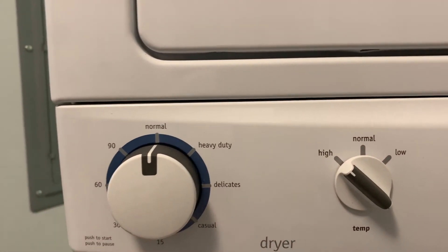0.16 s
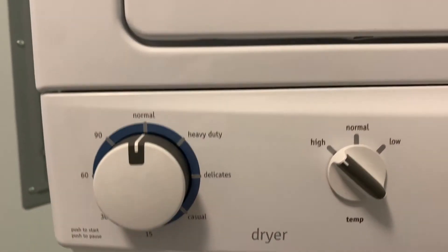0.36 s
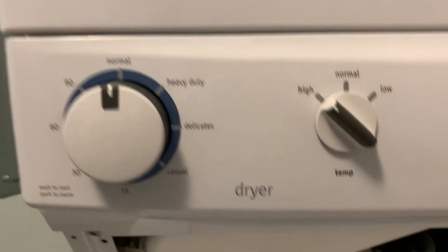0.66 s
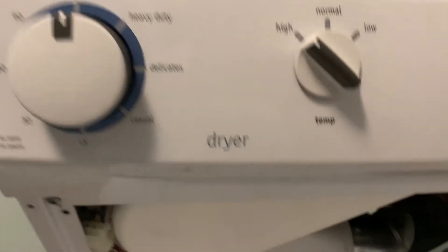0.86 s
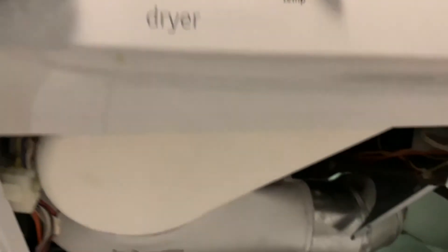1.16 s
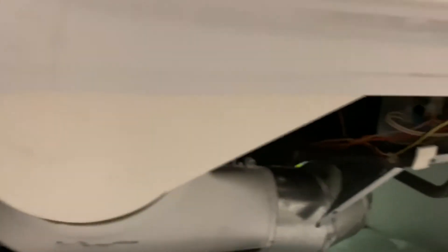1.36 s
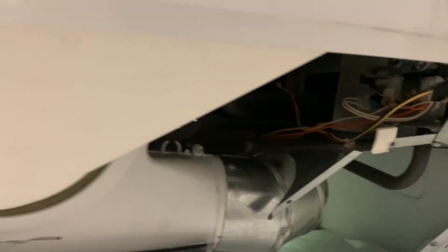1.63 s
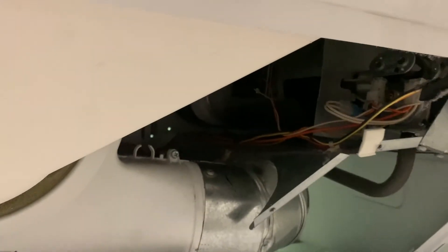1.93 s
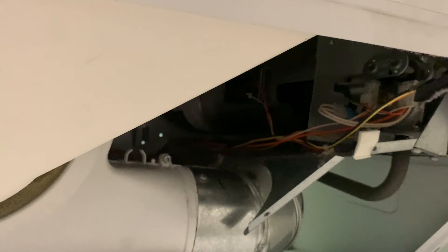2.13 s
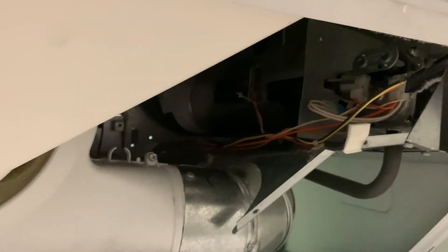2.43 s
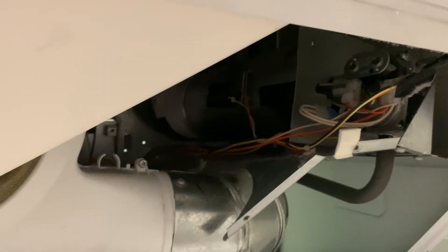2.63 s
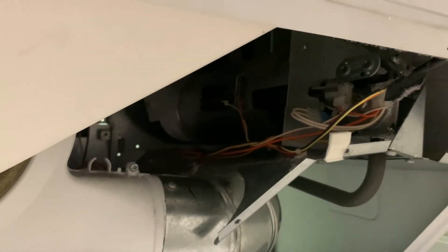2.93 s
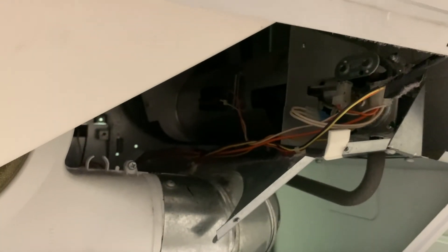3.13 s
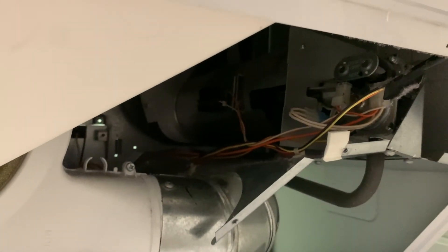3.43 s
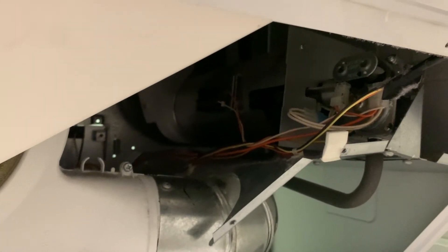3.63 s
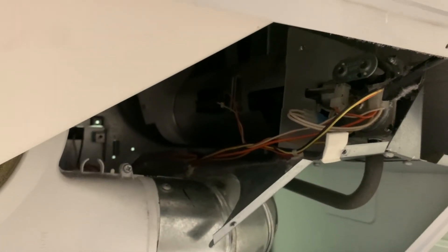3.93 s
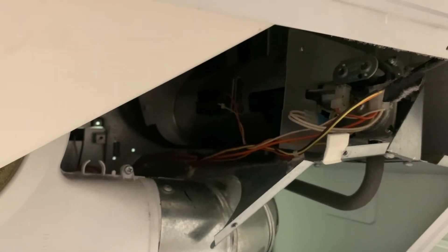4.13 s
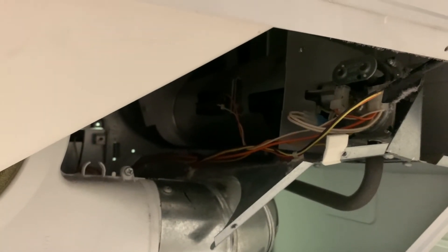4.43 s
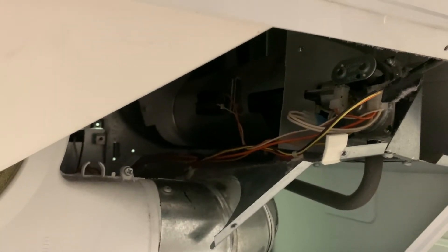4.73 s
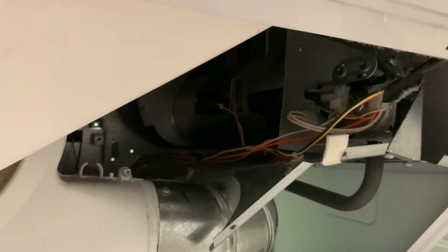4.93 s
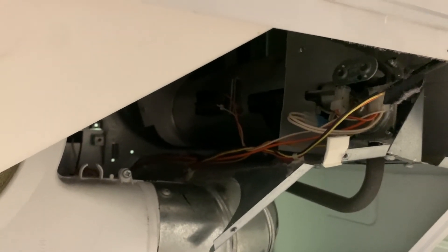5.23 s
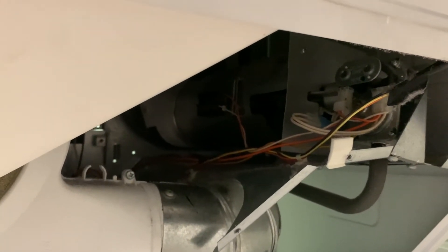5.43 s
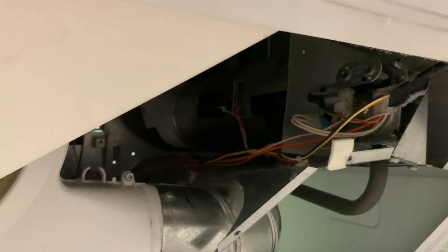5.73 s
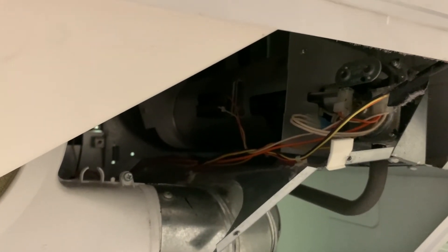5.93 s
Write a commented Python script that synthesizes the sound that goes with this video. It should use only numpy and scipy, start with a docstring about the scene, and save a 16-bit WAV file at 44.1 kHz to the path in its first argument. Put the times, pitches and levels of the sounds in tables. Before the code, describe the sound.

A clothes dryer heard close up in a small room. A brief rough squeal and metallic ringing fade from the start switch, leaving a low motor hum, drum rumble and soft rubbing. The hum grows as the microphone lowers to the open panel. Light rapid ticks come and go, the drum drags about once a second, and near the end a gas valve clacks hard and rings.

```python
"""Clothes dryer, close by, lower panel open

A dryer has just been switched on: its cabinet still rings and a rough squeal fades, both shaped from noise.
The motor hums in sines at twice the mains rate and ticks once a shaft turn, in short bursts of noise.
The drum rumbles, drags on its seal once a turn and growls on its rollers, all in coloured stereo noise.
The microphone moves from the control panel down to the open panel, so the hum grows.
Near the end a gas valve snaps over into ringing resonances, and the gain control ducks loud moments."""
import sys
import numpy as np
from scipy import signal
from scipy.fft import rfft, irfft
from scipy.io import wavfile
from scipy.ndimage import uniform_filter1d, minimum_filter1d

SR = 44100
rng = np.random.default_rng(int(sys.argv[2]) if len(sys.argv) > 2 else 0)


def bounce(signal):
    """Save signal as a 16-bit WAV file at the path given by the first command-line argument."""
    frames = np.transpose(np.atleast_2d(signal))
    limited = np.clip(frames, -1, 1)
    pcm = np.round(limited * 32767).astype(np.int16)
    wavfile.write(sys.argv[1], SR, pcm)


N = 268392
TIME = np.arange(N) / SR
BIN_HZ = np.arange(N // 2 + 1) * SR / N

HUM_HZ, SHAFT_HZ = 119.86, 29.386
WAVER_HZ = 4.3  # rate of the slow waver in rumble and drone
TICK_START_DB = -11  # ticks and their steady rub are fainter just after the start


def from_db(db):
    """Decibels to gain."""
    return 10 ** (np.asarray(db) / 20)


def rms_one(x):
    """Scale to unit rms."""
    return x / np.sqrt(np.mean(x ** 2) + 1e-20)


def in_time(rows):
    """Each column of a curve, sample by sample."""
    s, *columns = np.transpose(rows)
    return [np.interp(TIME, s, column) for column in columns]


def at_hz(points, hz):
    """Read a spectrum on a log-frequency axis."""
    f, value = np.transpose(points)
    return np.interp(np.log(hz + 1e-6), np.log(f), value)


def pan(db):
    """Left and right gains for a level difference; positive leans left."""
    return from_db(np.array([[.5], [-.5]]) * db)


def drift(rate):
    """Slow chance with spread 1: every 32nd sample is drawn, smoothed and joined up."""
    count = N // 32 + 2
    hz = np.arange(count // 2 + 1) * SR / N
    smoothing = 1 / (1 + (hz / rate) ** 2) ** 2
    slow = irfft(rfft(rng.standard_normal(count)) * smoothing, count)
    return np.interp(np.linspace(0, count - 1, N), np.arange(count), rms_one(slow))


def two_drifts(rate):
    """Independent complex drifts for left and right, which roughen a pure tone."""
    return np.array([drift(rate) + 1j * drift(rate) for _ in "LR"])


def cabinet(hz):
    """Gain of the steel box: each main resonance lifts a band, and a crowd of small ones ripples the treble."""
    # Each row: centre in Hz, width in Hz, lift in dB.
    resonances = [(753, 138, 3.2), (1012, 128, 0.5), (1227, 113, 1.2), (1464, 180, 2.7), (1744, 220, 2.0),
                  (2304, 220, 4.4), (2734, 220, 2.0), (3402, 220, 4.1), (5167, 120, 4.3), (5577, 110, 3.5),
                  (5986, 220, 4.6), (6330, 107, 2.5), (6912, 98, 3.0), (7407, 220, 4.9), (7730, 81, 2.7),
                  (8031, 92, 2.7), (8548, 220, 7.2), (8957, 150, 3.3), (9173, 114, 5.4), (10249, 220, 7.6),
                  (11304, 123, 4.7), (12252, 196, 7.4), (13630, 189, 4.8)]
    lift_db = sum(db / (1 + (2 * (hz - centre) / width) ** 2) for centre, width, db in resonances)
    grid = np.arange(0, SR / 2, 22)
    ripple = np.interp(hz, grid, rng.standard_normal(len(grid)))
    ripple_db = 2.4 * ripple * np.clip(hz / 600 - 1, 0, 1)  # sets in above 600 Hz
    return from_db(lift_db + ripple_db)


def stereo_noise(spectrum):
    """Noise coloured by the cabinet, alike at both microphones in the bass, diffuse in the treble; rms 1."""
    # How alike left and right are. Each row: frequency in Hz, correlation from 0 to 1.
    likeness = [(30, .75), (80, .96), (170, .95), (280, .78), (450, .45), (800, .35), (1500, 0), (16000, 0)]
    # Balance of the stereo picture. Each row: frequency in Hz, left over right in dB.
    lean = [(30, 24), (80, -4.5), (400, 2), (900, 4), (1800, 0), (3500, 0), (5500, -4), (8000, -0.5)]
    mid, side = rng.standard_normal((2, len(BIN_HZ))) + 1j * rng.standard_normal((2, len(BIN_HZ)))
    alike = np.clip(at_hz(likeness, BIN_HZ), -1, 1)
    both = np.sqrt(1 + alike) * mid + np.sqrt(1 - alike) * side * [[1], [-1]]
    low_cut = 1 / (1 + (spectrum[0][0] / 2 / (BIN_HZ + 1)) ** 2)
    high_cut = 1 / (1 + (BIN_HZ / spectrum[-1][0] / 2) ** 2) ** 2
    colour = low_cut * high_cut * from_db(at_hz(spectrum, BIN_HZ)) * cabinet(BIN_HZ)
    return rms_one(irfft(both * colour * pan(at_hz(lean, BIN_HZ)), N))


def bursts(rows):
    """Envelope of blows (s, dB, t60 in s) that start at once and die away; their powers add."""
    power = np.zeros(N)
    for s, db, t60 in rows:
        start = max(round(s * SR), 0)
        age = TIME[:min(N - start, int(2 * t60 * SR))]
        power[start:start + len(age)] += from_db(db - 60 * age / t60) ** 2
    return np.sqrt(power)


def swells(rows):
    """Gain of bell-shaped swells (middle s, length s, peak dB)."""
    return sum(from_db(db) * np.exp(-2 * ((TIME - s) / length) ** 2) for s, length, db in rows)


def resonance(x, hz, width_hz):
    """Two-pole resonance with gain 1 on top."""
    r = np.exp(-np.pi * width_hz / SR)
    feed = np.array([1, 0, -1]) * (1 - r * r) / 2
    feedback = [1, -2 * r * np.cos(2 * np.pi * hz / SR), r * r]
    return signal.lfilter(feed, feedback, x + 1e-18)


def tone(hz, lead, wander, flutter_db):
    """A stereo sine of rms about 1 whose phase and level waver; lead and wander are in radians."""
    phase = 2 * np.pi * (hz * TIME + rng.random()) + wander * drift(14.0)
    sine = np.sin(phase + np.array([[.5], [-.5]]) * lead)
    return np.sqrt(2) * sine * from_db(flutter_db * drift(7.7))


def at_ports(x):
    """A direct sound from the right reaches the left microphone port a little later."""
    # Each row: frequency in Hz, cycles by which the left port lags.
    port_lag = [(0, 0), (8400, 1.5), (13450, 2.5), (16000, 3.05)]
    cycles = np.interp(BIN_HZ, *np.transpose(port_lag))
    left = irfft(rfft(x) * np.exp(-2j * np.pi * cycles), N)
    return np.array([left, x])


def switch_ring(squeal_db=-45.5, wash_db=-35.5, wash_t60=1.25):
    """The cabinet is still ringing from the start switch, and a rough, wavering squeal fades with it."""
    # Spectrum of the ringing. Each row: frequency in Hz, relative density in dB per Hz.
    ring_spectrum = [(1200, 4), (2100, -1), (2650, 9.5), (3100, 1), (3600, 4), (4700, 5), (5600, -5.5),
                     (7000, -0.5), (8000, -23), (9200, -9), (10200, -5), (11000, -11), (16000, -30)]
    # Start-up squeal. Each row: time in seconds, pitch in Hz, level in dB against squeal_db.
    squeal_curve = [(0, 2540, 4), (.02, 2700, -3), (.035, 2800, -1), (.06, 2720, -4), (.09, 2660, 1),
                    (.12, 2620, -7), (.135, 2750, -3), (.165, 2740, -5), (.185, 2630, -8), (.21, 2650, -2),
                    (.226, 2720, -13), (.24, 2910, -2), (.28, 2770, -5), (.33, 2800, -12), (.45, 2770, -28),
                    (.6, 2770, -80)]
    roughness, spread_hz = .8, 190
    wash = stereo_noise(ring_spectrum) * bursts([(0, wash_db, wash_t60)])
    pitch_hz, level_db = in_time(squeal_curve)
    whistle = np.exp(2j * np.pi * np.cumsum(pitch_hz) / SR)
    squeal = rms_one(np.real(whistle * (1 + roughness * two_drifts(spread_hz))))
    return wash + from_db(squeal_db + level_db) * squeal


def drum_drag():
    """How hard the drum drags, 0 to about 1.2: a soft-edged stretch that comes round once a turn."""
    # Each row: middle in seconds, length in seconds, strength.
    drags = [(1.34, 0.53, 1.1), (2.478, 0.4, 1), (3.61, 0.33, 1.2), (4.82, 0.54, 1.04), (5.95, 0.53, 1)]
    edge_s = 0.1
    return sum(strength * (.5 + .5 * np.tanh((length - 2 * np.abs(TIME - middle)) / edge_s))
               for middle, length, strength in drags)


def motor(hum_db, side_follow=0.46):
    """Magnetic hum and its harmonics, with sidebands at steps of the shaft rate; some have their own level curves."""
    # Each row: multiple of the hum, shaft sideband number, level in dB against its curve,
    # left over right in dB, left lead in radians.
    lines = [(0, 1, -31.7, 1.4, -0.3), (1, -1, -18.8, 7.2, -0.3), (1, 0, 0.0, 1.6, 0.1),
             (1, 1, -13.0, -0.5, -0.0), (1, 2, -21.6, 0.8, -0.3), (2, -1, -10.2, 4.4, -0.1),
             (2, 0, -15.0, -2.1, -0.2), (2, 1, -20.0, -0.8, 0.6), (3, -1, -19.0, 2.8, -0.0),
             (3, 0, 0.0, 5.7, -0.8), (4, 0, -24.0, 8.8, -2.0), (4, 1, -30.6, 2.6, -0.2),
             (5, 0, 0.0, 4.4, -0.9), (6, -1, -32.7, 5.4, -0.9), (7, 0, -31.5, -1.7, 1.1),
             (10, 2, -40.5, 0, 0)]
    # Lower sideband near 210 Hz. Each row: time in seconds, level in dB against the other sidebands.
    sideband_level = [(0, -1.5), (0.6, 0), (1.3, -2), (1.6, 2), (2.1, 0.5), (2.7, -1), (3.25, 3),
                      (3.68, -4.5), (4.15, 3.5), (4.7, -3), (5.15, 0.5), (5.42, 4), (5.6, 2), (5.8, -5),
                      (6.09, -6)]
    # Third harmonic, sinking around the drags. Each row: time in seconds, level in dB.
    third_level = [(0, -38.5), (0.95, -32.5), (1.15, -42), (1.42, -59), (1.65, -30), (1.9, -28), (2.2, -30),
                   (2.35, -57), (2.58, -51), (2.76, -31.5), (3.25, -29), (3.5, -46), (3.75, -43),
                   (3.9, -36), (4.2, -26.5), (4.48, -33), (4.75, -37.5), (5.0, -42), (5.13, -33),
                   (5.55, -29.5), (5.8, -37), (6.09, -34)]
    # Fifth harmonic, stronger at the open panel. Each row: time in seconds, level in dB.
    fifth_level = [(0, -58), (0.8, -47), (1.4, -52), (1.95, -40), (2.25, -45), (2.5, -48), (2.95, -41.5),
                   (3.3, -41), (3.72, -51), (4.05, -44.5), (4.4, -40.5), (4.8, -53), (5.2, -46),
                   (5.55, -41), (5.85, -46), (6.09, -51)]
    middle_db = np.median(hum_db)
    side_db = middle_db + side_follow * (hum_db - middle_db)  # the rest changes less with position
    own_db = {(1, 0): hum_db, (2, -1): side_db + in_time(sideband_level)[0],
              (3, 0): in_time(third_level)[0], (5, 0): in_time(fifth_level)[0]}
    out = np.zeros((2, N))
    for multiple, sideband, db, lean_db, lead in lines:
        which = (multiple, sideband)
        unrest = .25 if which == (1, 0) else 1  # the main hum is the steadiest
        hz = multiple * HUM_HZ + sideband * SHAFT_HZ
        line = tone(hz, lead, wander=.15 * unrest, flutter_db=1.1 * unrest)
        out += line * pan(lean_db) * from_db(db + own_db.get(which, side_db))
    return out


def drone_level():
    """Level curve of the blower drone in dB: swells over a low, wavering rest."""
    # Swells as the drag sets in and lets go. Each row: middle in seconds, length in seconds,
    # peak in dB before the blower's trim.
    drone_swells = [(1.2, 0.14, -28), (1.41, 0.26, -27), (2.307, 0.1, -24.5), (2.634, 0.135, -24),
                    (2.89, .09, -33), (3.44, 0.08, -26), (3.745, .125, -24.5), (4.61, 0.2, -27.5),
                    (4.985, 0.18, -22.5), (5.96, 0.2, -31)]
    rest_db, waver_db = -40, 2.5
    rest = from_db(rest_db + waver_db * drift(WAVER_HZ))
    return 20 * np.log10(np.hypot(swells(drone_swells), rest))


def blower(drone_db):
    """The blower housing drones on one wavering note, leaning left and swelling around the drags."""
    drone = tone(297, lead=.05, wander=.18, flutter_db=.4)
    return drone * from_db(drone_db - 2.5) * pan(6.5)


def panel(level_db):
    """The sheet-metal front booms briefly and sings two thin notes at sidebands of the motor."""
    # Boom just after the start. Each row: time in seconds, level in dB.
    boom_level = [(0, -48), (0.2, -43), (0.7, -38), (1.0, -47), (1.5, -39), (2.0, -77), (6.09, -60)]
    # Thin whine near 750 Hz. Each row: time in seconds, level in dB.
    whine_level = [(0, -43), (0.15, -42.5), (0.55, -43.5), (0.88, -41.5), (1.05, -44), (1.6, -51),
                   (6.09, -58)]
    boom = tone(56.5, lead=0, wander=.15, flutter_db=.5) * from_db(in_time(boom_level)[0])
    low = tone(4 * HUM_HZ + SHAFT_HZ, lead=0, wander=.2, flutter_db=1.5)
    whine = tone(6 * HUM_HZ + SHAFT_HZ, lead=.3, wander=.5, flutter_db=1.5)
    return boom * pan(-1.5) + from_db(level_db - 48.5) * low + whine * from_db(in_time(whine_level)[0])


def drum(rumble_db, body_db=-25.0, crossover_hz=340):
    """The drum rumbles in a deep body and a higher shell, and its rim rubs grainily over the felt seal."""
    # Rumble spectrum. Each row: frequency in Hz, relative density in dB per Hz.
    rumble_spectrum = [(25, -27), (42, -29), (56, -8), (80, -10), (105, -10.5), (180, -6), (250, -10.5),
                       (310, -5.5), (440, -5), (540, -9.5), (640, -12), (760, -6), (900, -14.5),
                       (1600, -25)]
    # Rubbing spectrum. Each row: frequency in Hz, relative density in dB per Hz.
    rub_spectrum = [(700, 2), (1000, 7), (1300, 1), (1600, -1), (1900, -4.5), (2350, -4.5), (2900, -10),
                    (3450, -10.5), (4200, -10), (5500, -18.5), (7000, -17), (10000, -63), (16000, -27)]
    # Pressure of rim on seal. Each row: time in seconds, rubbing level in dB before a lift of 4 dB.
    rub_level = [(0, -49.5), (0.5, -45.5), (0.95, -48), (1.15, -44), (1.42, -43), (1.65, -44.5),
                 (2.15, -44.5), (2.3, -41.3), (2.62, -43), (2.85, -44), (3.22, -45.5), (3.42, -42.5),
                 (3.75, -41.5), (3.9, -44.5), (4.4, -45.5), (4.6, -43), (5.02, -41.5), (5.14, -46),
                 (5.6, -42.5), (5.85, -44), (6.09, -41.5)]
    rumble = stereo_noise(rumble_spectrum)
    deep = signal.sosfiltfilt(signal.butter(2, crossover_hz, fs=SR, output="sos"), rumble)
    body = deep * from_db(body_db + 1.8 * (rumble_db - rumble_db.mean()))
    shell = (rumble - deep) * from_db(rumble_db + 4.0)
    grain_db = 1.28 * drift(43)
    rub = stereo_noise(rub_spectrum) * from_db(in_time(rub_level)[0] + 4.0 + grain_db)
    return body + shell + rub


def rollers(front):
    """The support rollers growl in a narrow band of the drum, in uneven surges."""
    # Growl spectrum. Each row: frequency in Hz, relative density in dB per Hz.
    growl_spectrum = [(280, -21), (380, -3), (440, -2), (480, -7), (560, -32), (800, -31.5)]
    # Each row: middle in seconds, length in seconds, peak in dB.
    surges = [(1.47, 0.11, -30.5), (2.22, .12, -41), (2.5, 0.22, -28.5), (2.87, 0.12, -33),
              (3.13, 0.075, -29), (3.53, 0.17, -28), (3.9, .1, -30), (4.2, 0.11, -31.5), (4.5, 0.17, -44),
              (4.76, 0.13, -30), (4.95, 0.07, -31), (5.15, 0.13, -29), (5.95, 0.2, -36)]
    rest = from_db(-34 - 5 * front)  # fainter in front of the control panel
    return stereo_noise(growl_spectrum) * np.hypot(swells(surges), rest)


def unsettled(s):
    """1 for the first third of a second, then falling to 0 once the machine has settled."""
    settle_s = 0.66
    return np.clip(2 * (1 - s / settle_s), 0, 1)


def tick_hits(drag, sharp_db=7.5):
    """Rows (s, dB) of all ticks: the sharp ones, and a faint one on each shaft turn between them."""
    # Spells of firmer ticking. Each row: start in seconds, length in seconds, lift in dB.
    spells = [(0.7, .4, 5.5), (1.9, .55, 7), (2.6, .12, 4), (3.3, .42, 5), (3.93, .09, 7.5), (4.28, .16, 7),
              (4.54, .22, 2.5), (4.88, .08, 6), (5.23, .42, 8.5)]
    # Single sharp ticks. Each row: time in seconds, level in dB before the lift sharp_db.
    sharp_ticks = [(0.273, -39.5), (1.3907, -41.5), (1.4915, -40.5), (1.5274, -44), (1.5993, -38),
                   (1.6342, -35.5), (1.6676, -38.5), (1.703, -38.5), (1.7365, -37.5), (1.8771, -41.5),
                   (2.042, -35), (2.108, -36), (2.2752, -37.5), (2.3804, -40.5), (2.858, -38.5),
                   (2.8933, -35), (2.9267, -36), (3.0945, -38), (3.234, -38), (3.8776, -37.5),
                   (3.9105, -39), (4.0517, -37.5), (4.0861, -37), (4.12, -36.5), (4.1525, -36.5),
                   (4.1864, -36.5), (4.2198, -35), (4.2542, -37), (4.6867, -40), (4.8274, -40.5),
                   (5.137, -35.5), (5.1726, -40.5), (5.4131, -35), (5.4585, -48), (5.482, -36.5),
                   (5.5139, -38), (5.5797, -38)]
    first_s, early_s = 0.0345, 0.0065
    faint_db, drag_db, scatter_db = -43, 1, 2.5
    s = np.arange(first_s, TIME[-1], 1 / SHAFT_HZ)
    dragging = np.interp(s, TIME, drag)  # under drag the faint ticks come slightly louder and early
    db = faint_db + drag_db * dragging + TICK_START_DB * unsettled(s)
    db = db + scatter_db * rng.standard_normal(len(s))
    for start, length, spell_db in spells:
        db = db + spell_db * ((s >= start) & (s < start + length))
    sharp = np.array(sharp_ticks) + [0, sharp_db]
    free = np.abs(s[:, None] - sharp[:, 0]).min(axis=1) > .5 / SHAFT_HZ
    faint = list(zip((s - early_s * dragging)[free], db[free]))
    return faint + list(sharp)


def shaft_ticks(drag, after_db=-8, steady_db=-48, contact_t60=0.067, after_t60=0.23):
    """A light scuff once a shaft turn over a faint steady rub: pressure envelopes on one coloured noise."""
    # Scuff spectrum. Each row: frequency in Hz, relative density in dB per Hz.
    scuff_spectrum = [(1500, -13), (4000, 2), (5500, -2), (8500, 6), (10200, 2.5), (11000, -0.5),
                      (13000, 1), (15000, -7), (16000, -2.5)]
    hits = tick_hits(drag)
    contact = bursts([(s, db, contact_t60) for s, db in hits])
    # the box carries each tick on briefly
    after = bursts([(s, db + after_db, after_t60) for s, db in hits])
    steady = from_db(steady_db + TICK_START_DB * unsettled(TIME))
    total = np.sqrt(contact ** 2 + after ** 2 + steady ** 2)
    pressure = signal.lfilter(*signal.butter(1, 125, fs=SR), total)  # softens the onsets
    colour = from_db(at_hz(scuff_spectrum, BIN_HZ)) * cabinet(BIN_HZ)
    noise = rms_one(irfft(rfft(rng.standard_normal(N)) * colour, N))
    return from_db(-8.0) * at_ports(pressure * noise)  # the trim sets all ticks and the rub


def valve_body(force):
    """What the valve body makes of a force: ringing modes and a bright crack."""
    # Each row: frequency in Hz, width in Hz, relative level in dB.
    body_modes = [(2160, 120, 2), (2350, 130, 0), (2700, 180, -8), (3290, 170, 2.5), (3520, 140, 2),
                  (3690, 180, 0), (4650, 190, -1), (4900, 190, -4.5), (5450, 260, -6.5), (6100, 180, -5),
                  (6500, 170, -5), (6800, 240, -3), (7700, 480, -7.5), (8550, 540, -5.5), (10300, 400, -14),
                  (11400, 420, -4), (12700, 300, -11), (14600, 370, -10), (15000, 500, -10.5)]
    ring = sum((-1) ** k * from_db(db) * resonance(force, hz, width)
               for k, (hz, width, db) in enumerate(body_modes))
    crack = signal.sosfilt(signal.butter(2, 2400, "high", fs=SR, output="sos"), force + 1e-18)
    return ring + from_db(-17.5) * crack


def bracket(struck_s, ring_db=-32.5):
    """The loose bracket keeps rattling against the frame, so each of its modes rings roughly and unevenly."""
    # Each row: frequency in Hz, level in dB against ring_db, t60 in seconds.
    bracket_modes = [(1375, -6, .4), (2170, 1, .4), (2360, -1, .5), (2790, -5, .3), (3300, -1, .4),
                     (3490, -4, .5), (3680, -3, .3), (4560, -2, .2), (4670, 0, .5), (4950, -1, .45),
                     (5540, -2, .35), (5850, -6, .35), (6800, -2, .35), (7450, -8, .3)]
    ring = 0
    for hz, db, t60 in bracket_modes:
        rough = rms_one(np.real(two_drifts(55) * np.exp(2j * np.pi * hz * TIME)))
        ring = ring + rough * bursts([(struck_s, ring_db + db, t60)])
    return ring


def gas_valve(early_db=-22.5, early_t60=0.36, late_db=-32.0, late_t60=1.64,
              linger_db=-30, linger_t60=0.55, split_hz=7000):
    """The plunger rattles brightly and slams home, the frame thumps, and the bracket and sheet metal ring on."""
    # Plunger lifting, scraping, seating and bouncing. Each row: time in seconds, strength in dB,
    # rattle t60 in seconds, weight of the low part in dB.
    contacts = [(5.646, -14, 0.06, -10), (5.6503, -13.5, 0.33, -6), (5.655, -20, 0.04, 7),
                (5.6579, 9.5, 0.017, -8.5), (5.6613, 2.5, 0.037, 1.5), (5.665, -5.5, 0.096, 2)]
    # Spectrum of the ringing sheets. Each row: frequency in Hz, relative density in dB per Hz.
    wash_spectrum = [(1200, 7.5), (2200, 0.5), (2850, 2), (3350, 3.5), (4100, -1), (4650, 1), (5600, -1.5),
                     (6300, -8), (6850, 0), (7900, -45), (10300, -16), (11500, -11), (16000, -41)]
    seated = max(contacts, key=lambda row: row[1] + row[3])[0]  # the heaviest contact
    linger = [(seated, linger_db, linger_t60)]
    bright_rows = [(s, db, t60) for s, db, t60, _ in contacts]
    heavy_rows = [(s, db + weight_db, t60) for s, db, t60, weight_db in contacts]
    bright = bursts(bright_rows + linger) * rng.standard_normal(N)
    heavy = bursts(heavy_rows + linger) * rng.standard_normal((2, N))
    high, low = (signal.butter(4, split_hz, kind, fs=SR, output="sos") for kind in ("high", "low"))
    # the treble comes direct from one side, the rest differs left and right
    force = at_ports(signal.sosfilt(high, bright + 1e-18)) + signal.sosfilt(low, heavy + 1e-18)
    knock = from_db(-10.5) * resonance(force, 850, 420)
    thump = -bursts([(seated, -9, .04)]) * np.cos(2 * np.pi * 145 * (TIME - seated))
    fading = bursts([(seated, early_db, early_t60), (seated, late_db, late_t60)])
    shudder = from_db(2 * drift(60))  # of the loose sheets
    wash = stereo_noise(wash_spectrum) * fading * shudder
    body = (from_db(1.0) * valve_body(force) + knock) * pan(-0.76)
    return body + thump + wash + bracket(seated)


def scene():
    """The running dryer: motor, blower, front sheet, drum, rollers and ticks, with start switch and gas valve."""
    # Hum, growing as the microphone moves down to the open panel. Each row: time in seconds, level in dB.
    hum_level = [(0, -27), (0.04, -29.5), (0.55, -26.5), (1.2, -23.5), (1.8, -22), (2.3, -20.5),
                 (6.09, -20.5)]
    # Control panel, loudest while the microphone faces it. Each row: time in seconds, relative level in dB.
    panel_level = [(0, -1.5), (0.9, 0.5), (1.45, -5.5), (2.0, -12), (6.09, -25)]
    hum_db, = in_time(hum_level)
    panel_db, = in_time(panel_level)
    drag, front = drum_drag(), from_db(panel_db)
    # the rumble gives way a little under drag and in front of the control panel
    rumble_db = -38.5 - 0.5 * drag - 2 * front + 0.46 * drift(WAVER_HZ)
    # the motor hums louder under load, and leans right in front of the control panel
    hum = motor(hum_db + 1.5 * drag) * pan(.7 - 3.6 * front)
    running = hum + blower(drone_level()) + panel(panel_db)
    running = running + drum(rumble_db) + rollers(front) + shaft_ticks(drag)
    return running + switch_ring() + gas_valve()


def gain_control(x, threshold_db=-13.5, hold_s=0.1, release_db_per_s=65):
    """Loud moments pull the gain down; it is held briefly, then climbs back."""
    level_db = 10 * np.log10(uniform_filter1d(np.mean(x ** 2, axis=0), size=260) + 1e-12)
    half = int(hold_s * SR / 2)
    excess_db = np.maximum(level_db - threshold_db, 0)
    held_db = -minimum_filter1d(-excess_db, 2 * half + 1, origin=half)
    release_db = release_db_per_s * TIME
    cut_db = np.maximum.accumulate(held_db + release_db) - release_db
    return x * from_db(-uniform_filter1d(cut_db, size=90))


def record(dry):
    """Gain control, clipping at full scale, and a steep top cut at 15.9 kHz."""
    limited = np.clip(gain_control(dry), -1, 1)
    return signal.sosfilt(signal.ellip(10, .1, 90, 15900, fs=SR, output="sos"), limited)


dry = scene()
out = record(dry)
bounce(out)
```